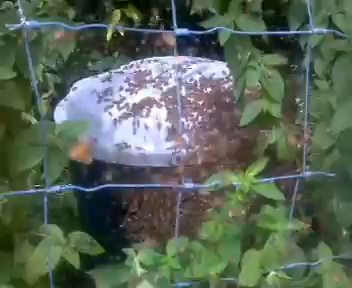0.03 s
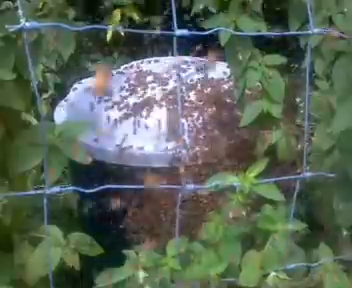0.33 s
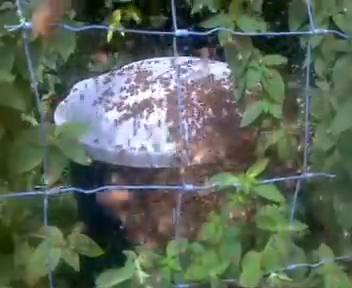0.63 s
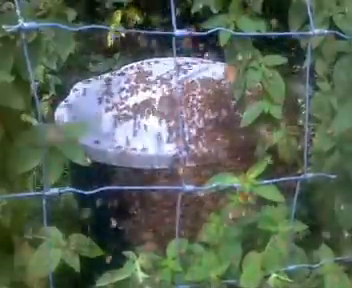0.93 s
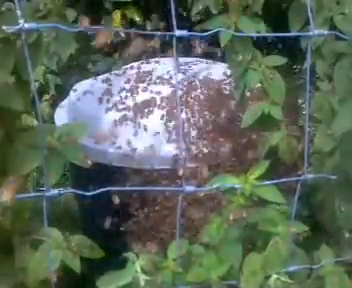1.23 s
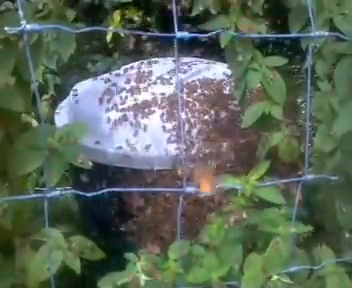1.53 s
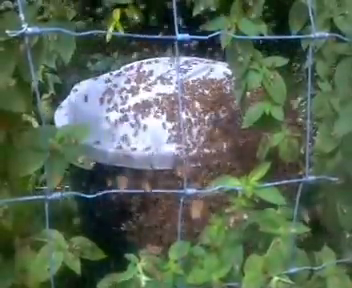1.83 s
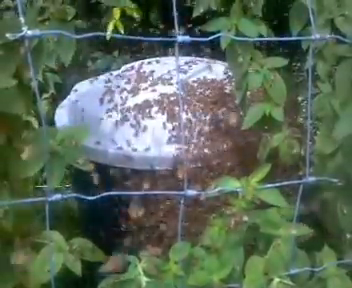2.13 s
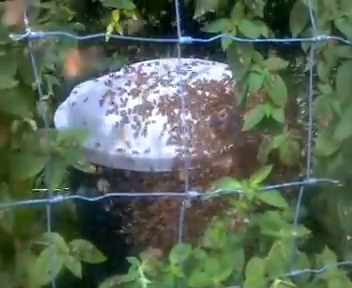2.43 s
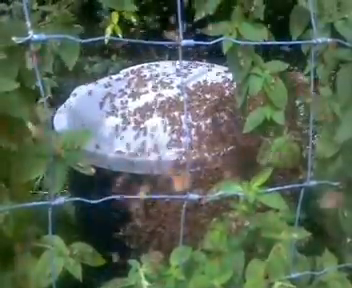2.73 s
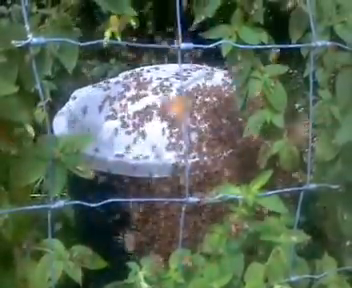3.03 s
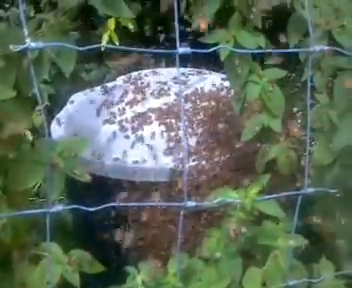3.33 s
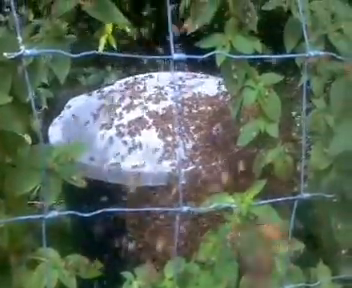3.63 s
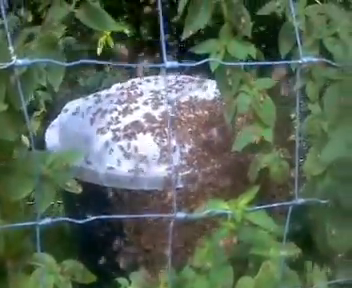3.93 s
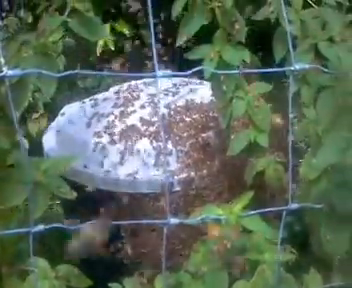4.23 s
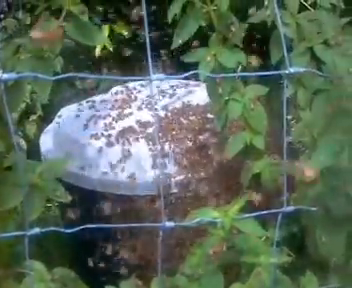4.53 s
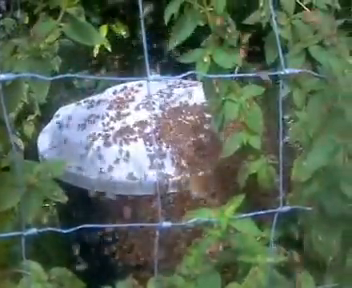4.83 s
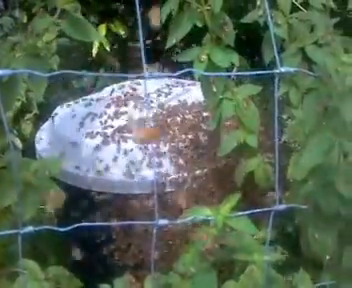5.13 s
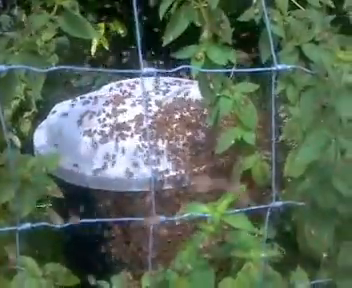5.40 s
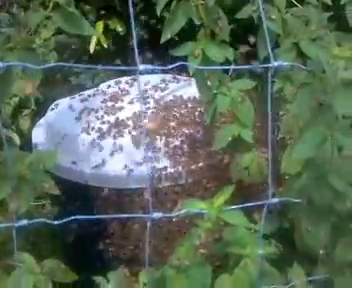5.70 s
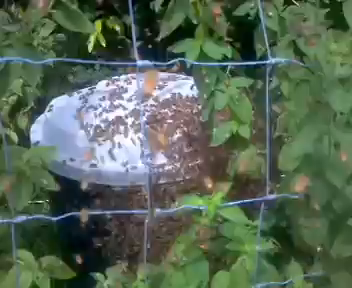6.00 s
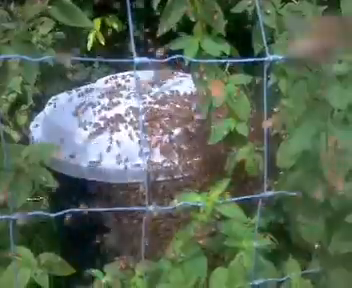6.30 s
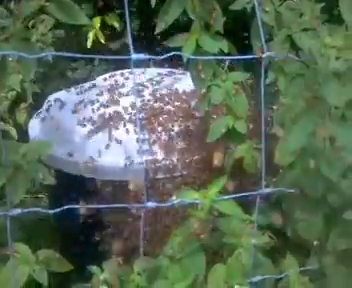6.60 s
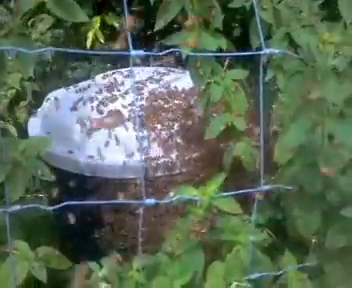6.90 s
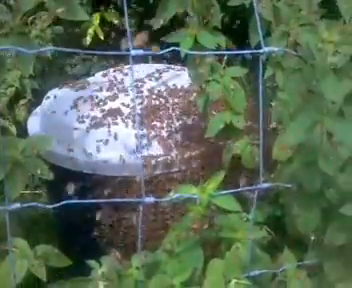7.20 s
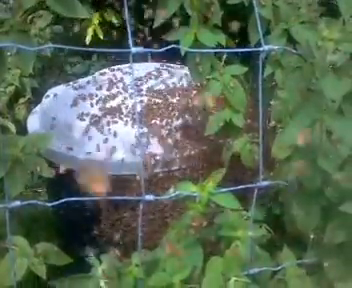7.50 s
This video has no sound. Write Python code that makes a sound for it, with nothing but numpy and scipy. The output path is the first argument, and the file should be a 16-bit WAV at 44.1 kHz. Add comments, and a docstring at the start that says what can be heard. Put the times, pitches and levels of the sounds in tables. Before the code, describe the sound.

Outdoors among leaves, a mass of bees drones continuously, with individual bees darting close past the stereo microphones, mostly toward the left. From the start a bigger insect adds a bright, scratchy trill above its own low hum. After about four seconds the trill quickens into tiny squeaks and ends on one brief falling chirp, leaving the slightly softer swarm and a faint hiss.

```python
"""From the start, honeybees swarm round a bucket in the undergrowth: their wingbeats blend into a hum
near 250 Hz over a soft hiss, and single bees swell out of it as they pass. Among them a larger insect
rasps at 120 strokes a second. Just after 4 s it speeds up and squeaks, then stops with a short chirp
at about 4.5 s. The bees buzz on to the end, a little quieter. All of this reaches two microphones;
each channel is one microphone minus a delayed copy of the other."""
import sys
import numpy as np
from scipy import signal
from scipy.fft import rfft, irfft, next_fast_len
from scipy.io import wavfile
from scipy.ndimage import uniform_filter1d, map_coordinates

SR = 44100
rng = np.random.default_rng(int(sys.argv[2]) if len(sys.argv) > 2 else 0)


def digitize_waveform(pressure):
    """Quantize a signal to 16-bit integers and store it at the path in sys.argv[1].

    Rows of a 2-D input are taken as channels; values are limited to [-1, 1].
    """
    field = np.atleast_2d(pressure).T
    bounded = np.clip(field, -1, 1)
    quanta = np.round(bounded * 32767).astype(np.int16)
    wavfile.write(sys.argv[1], SR, quanta)


N = 341775
T = np.arange(N) / SR


# The swarm's low note, the note an octave up, and the buzz above both: f/Hz, level/dB
LOW_NOTE_TONE = [(20, -90), (100, -30), (190, -8), (245, -7.5), (285, -1), (340, -27), (450, -61)]
OCTAVE_TONE = [(20, -120), (290, -26), (390, -1), (500, -3), (560, 2), (630, -29), (760, -56)]
BUZZ_TONE = [(20, -120), (500, -17), (630, -4.5), (760, -3), (870, 1.5), (1000, 0), (1300, -1),
             (1500, -7.5), (1900, -19), (2500, -38), (3200, -19), (6000, -25.5), (15000, -53)]

def swarm():
    """Brisk bees, slower loaded ones and a few off-pitch strays; their tangled overtones buzz."""
    mean_db, swell_db = swarm_activity()
    brisk = wingbeats(count=64, pitch_hz=252.8, drift=.031, waver=.016, swell=3.5, lag_ms=.15, lean=.23)
    loaded = wingbeats(count=30, pitch_hz=231.4, drift=.05, waver=.026, swell=0, lag_ms=.17, lean=.11)
    strays = wingbeats(count=10, pitch_hz=232.4, drift=.11, waver=.02, swell=1.5, lag_ms=.18, lean=.16)
    bees = unit(brisk) + amp(-2) * unit(loaded) + amp(-13) * unit(strays)
    bees = leaf_echo(bees, echo_db=-21, fade_s=0.24)
    low_note = amp(-3 + 1.1 * swell_db) * shaped(bees, LOW_NOTE_TONE)
    octave = amp(0.2 + 0.69 * swell_db) * shaped(bees, OCTAVE_TONE)
    buzz = amp(-5 + swell_db) * shaped(bees, BUZZ_TONE)
    return amp(mean_db) * (low_note + octave + buzz)


def wingbeats(count, pitch_hz, drift, waver, swell, lag_ms, lean):
    """Each wingbeat is one pulse of air; every bee wanders in pitch, distance and direction."""
    out = np.zeros((2, N + 1))
    t = np.arange(0, N / SR + .2, .004)
    for _ in range(count):
        rate = pitch_hz * np.exp(drift * wobble(1.2, t) + waver * wobble(17, t))
        cycles = np.cumsum(rate) * t[1] + rng.random()
        beat_times = np.interp(np.arange(2, cycles[-1]), cycles, t)
        strength = np.interp(beat_times, t, amp(1.45 * swell * np.tanh(wobble(3.03, t) / 2)))
        lag_s = np.interp(beat_times, t, lag_ms * wobble(1, t)) / 1000
        rightward = np.interp(beat_times, t, lean * wobble(4, t))
        for mic, side in enumerate((-.5, .5)):
            pulse = strength * (1 + 2 * side * rightward)
            at = (beat_times + side * lag_s - .05) * SR
            inside = (at >= 0) & (at < N)
            whole, part = at[inside].astype(int), at[inside] % 1
            out[mic, whole] += pulse[inside] * (1 - part)  # two samples share each pulse
            out[mic, whole + 1] += pulse[inside] * part
    return out[:, :N] - out.mean()


# How busy the swarm is close by: t/s, level/dB
SWARM_LEVEL = [(0.0, -34), (0.75, -35.0), (0.93, -33.0), (1.77, -35), (2.01, -33), (2.67, -34.0),
               (2.79, -33), (3.15, -35.5), (3.48, -36), (3.84, -33.5), (3.97, -36.5), (4.9, -37.5),
               (5.35, -36.5), (6.0, -37.5), (6.45, -38), (6.7, -37.5), (7.42, -36.5), (7.75, -38)]

def swarm_activity():
    """The swarm's average level, and how far it swells above or sinks below that, in dB."""
    level_db, = curves(SWARM_LEVEL)
    return level_db.mean(), level_db - level_db.mean()


# Bees passing close by:
# t/s, wingbeat f/Hz, low note level/dB, octave level/dB, lean to the left (0-1), half-length/s
CLOSE_PASSES = [(0.791, 252.4, -42, -35.5, 0.4, 0.061), (0.925, 252, -33, -35, 0.35, 0.036),
                (1.052, 251, -35, -31.5, .65, 0.04), (1.242, 245.5, -33.5, -37, .55, 0.032),
                (1.48, 239.4, -43, -36, 0.2, 0.029), (1.51, 255.7, -42, -33.5, 0.2, .04),
                (1.96, 249, -43, -35.5, 0.1, 0.068), (2.116, 240, -35, -37, 0.9, 0.039),
                (2.251, 243, -33, -33, .3, 0.041), (2.629, 221, -44, -40, .3, .09),
                (4.679, 218.7, -41, -38.5, .3, 0.064), (4.8, 259.3, -46, -35, .3, 0.037),
                (2.5, 229.7, -32, -35, 0.4, 0.041), (2.782, 255.4, -26.5, -33.5, 1, 0.037),
                (3.554, 244, -32.5, -36, 0.9, 0.036), (3.751, 249, -31, -33.5, .25, 0.038),
                (3.871, 225.3, -21.5, -27, 0.8, 0.015), (4.146, 241, -31, -43, 0, 0.029),
                (4.556, 258.7, -36, -35, 0.1, 0.0362), (4.65, 257, -33, -39, 0.3, 0.033),
                (5.107, 253, -29.5, -40, 0, 0.027), (5.264, 244, -30.5, -36.5, 0.6, 0.041),
                (5.958, 250, -34, -39, 0.55, 0.033), (6.883, 251, -40, -48, 0.7, 0.037),
                (6.976, 241, -39, -55, 0.4, .035), (7.188, 267.4, -44, -37.5, 0.1, 0.039),
                (7.415, 248, -40, -33, 0.7, 0.031)]

def passing_bees(doppler_s=0.00036, waver=0.0083):
    """A close bee swells and fades; the quicker it goes by, the further its pitch falls."""
    out = np.zeros((2, N + SR))
    t = np.arange(SR // 2) / SR - 1 / 4  # zero when the bee is closest
    sides = np.array([[1], [-1]])  # left, right
    for when, hz, low_db, octave_db, lean, half_s in CLOSE_PASSES:
        swell = np.hanning(len(t)) / (1 + (t / half_s) ** 2)
        fall = doppler_s / half_s * np.tanh(t / half_s)
        pitch = hz * (1 - fall + waver * wobble(24.87, t + 1))
        lag_s = rng.normal(0, 0.0001) * sides / 2
        phase = 2 * np.pi * (np.cumsum(pitch) / SR + hz * lag_s)
        levels = [low_db - 2, octave_db - 3] + [octave_db - 14 - 2 * k for k in range(7)]
        buzz = sum(amp(db) * np.sin(k * phase + 2 * np.pi * rng.random())
                   for k, db in enumerate(levels, 1))
        out[:, round(when * SR):][:, :len(t)] += np.sqrt(2) * swell * buzz * (1 + lean * sides)
    return out[:, SR // 4:][:, :N]


# The larger insect's strokes a second, before the speed-up is added: t/s, f/Hz
CRUISING_RATE = [(0.05, 122), (0.42, 118.8), (0.9, 120.2), (1.05, 118.6), (1.55, 120.8), (1.66, 119.5),
                 (2.08, 121), (2.35, 119.5), (2.55, 121), (2.8, 119.8), (4.14, 120.3)]

def large_insect(speed_up=.115, jitter=0.005):
    """Each stroke pushes the air and scrapes: a low hum under a trill of short bursts."""
    cruise, = curves(CRUISING_RATE)
    rate = cruise * (1 + speed_up * ramp(start_s=4.16, length_s=0.156))
    strokes = np.cumsum(rate * (1 + jitter * wobble(29.88, T))) / SR  # strokes made so far
    hum = at_both_mics(insect_hum(strokes), lag_ms=-0.1)
    trill = rasp(strokes) + squeaks(strokes) + last_chirp()
    return hum + leaf_echo(at_both_mics(trill, lag_ms=-0.017), echo_db=-13, fade_s=0.04)


# The pure tones in the insect's hum: multiple of the stroke rate, level/dB
HUM_TONES = [(1, 0.5), (2, 8), (3, 2), (4, -3), (5, -11.5)]
# The changing boost on the third of those tones: t/s, level/dB
THIRD_TONE_BOOST = [(0.0, 7), (0.13, 8), (0.3, 3.5), (1.05, 1), (2.55, 4), (2.76, -1), (2.88, 5.5),
                    (3.2, 0), (3.9, 5.5), (4.05, -2), (4.2, 6)]

def insect_hum(strokes, fade_start_s=4.23, fade_db_per_s=86, waver_db=1.1):
    """Air pushed by the strokes hums on, then dies away, the highest tones first."""
    fade_db = fade_db_per_s * np.maximum(T - fade_start_s, 0)
    boost_db, = curves(THIRD_TONE_BOOST)
    hum = np.zeros(N)
    for k, db in HUM_TONES:
        level_db = db + (k == 3) * boost_db - k * fade_db + waver_db * wobble(15, T)
        hum += amp(level_db) * np.sin(2 * np.pi * (k * strokes + rng.random()))
    return np.sqrt(2) * amp(-49) * hum


# How strong the two scrapes are: t/s, low scrape level/dB, high scrape level/dB
SCRAPE_LEVELS = [(0.0, -45, -44), (0.1, -49.5, -46), (0.42, -45, -45.5), (0.62, -44.5, -50),
                 (0.72, -41.5, -44), (0.93, -42.5, -46), (1.02, -45.5, -47), (1.2, -39, -42),
                 (1.35, -43.5, -43), (1.75, -41, -41), (1.9, -39, -39.5), (2.08, -40.5, -43),
                 (2.21, -42, -38.5), (2.5, -39, -43.5), (2.8, -42, -41.5), (2.87, -46, -59),
                 (2.95, -45, -52), (3.1, -44.5, -50), (3.3, -44, -46), (3.6, -45.5, -46.5),
                 (3.9, -48, -45.5), (4.18, -43.5, -47.5), (4.3, -48, -59), (4.42, -49, -57),
                 (4.51, -48.5, -57.5), (4.55, -68, -70)]
# The tone of the low scrape and of the high one: f/Hz, level/dB
LOW_SCRAPE_TONE = [(1500, -58), (2800, -20.5), (3500, -9), (3900, -5.5), (4220, 0.5), (4500, -4),
                   (4900, -2.5), (5400, -6), (6500, -43)]
HIGH_SCRAPE_TONE = [(4600, -37), (5300, 8.5), (5800, 1.5), (6380, 0), (6600, -3), (6850, -5), (7600, -19),
                    (11000, -40)]

def rasp(strokes, lead=0.036, between_strokes=.11, flutter_db=0.5):
    """A short bright scrape leads a longer, lower one; the return stroke scrapes faintly."""
    return_stroke = amp(-9) * burst(strokes - .58, sharpness=2.6)
    low_bursts = burst(strokes, sharpness=1.5) + return_stroke
    high_bursts = burst(strokes + lead, sharpness=2.6)
    low = patchy(scraping(strokes), depth_db=1.3) * (low_bursts + between_strokes)
    high = patchy(scraping(strokes), depth_db=1.5) * (high_bursts + between_strokes)
    low_db, high_db = curves(SCRAPE_LEVELS)
    steady = amp(low_db - 3.5) * shaped(low, LOW_SCRAPE_TONE)
    steady += amp(high_db - 3.5) * shaped(high, HIGH_SCRAPE_TONE)
    return (steady + ringing(low, high)) * amp(flutter_db * wobble(16, T))


def burst(strokes, sharpness):
    """One smooth burst a stroke; more sharpness makes it shorter."""
    return np.maximum(np.cos(2 * np.pi * strokes), 0) ** sharpness


def scraping(strokes, likeness=.58):
    """Noise that partly repeats: each stroke rubs over much the same surface as the one before."""
    noise = rng.standard_normal((int(strokes[-1]) + 2, SR // 100))  # one row a stroke
    surface = signal.lfilter([1], [1, -likeness], noise, axis=0)
    row = strokes.astype(int)
    samples_in = np.arange(N) - np.searchsorted(row, row)
    return surface[row, samples_in % surface.shape[1]]


def patchy(x, depth_db):
    """Narrow bands of pitch swell and fade at random, a few hundredths of a second each."""
    bands = signal.stft(x, nperseg=256)[2]
    patches = uniform_filter1d(rng.standard_normal(bands.shape), size=3, axis=0)
    patches = uniform_filter1d(patches, size=24, axis=1)
    return unit(signal.istft(bands * amp(depth_db * unit(patches)), nperseg=256)[1][:N])


# Moments when the rasp rings: t/s, f/Hz, level/dB, half-length/s
RINGS = [(0.017, 6600, -37.5, 0.018), (0.2, 6320, -47, .015), (0.83, 4120, -44, .035),
         (0.937, 4150, -44, .035), (1.319, 6280, -44, .025), (1.837, 5700, -34, 0.022),
         (2.05, 5740, -35, 0.037), (2.047, 4400, -42, .025), (2.163, 4240, -37, .016),
         (2.277, 4260, -44, 0.038), (2.337, 5820, -44, .02), (2.46, 5620, -40, .04),
         (2.55, 6440, -42, 0.014), (2.68, 4240, -42, 0.015), (2.74, 6300, -46, .055),
         (3.03, 4150, -40.5, 0.021), (3.15, 4280, -42, 0.022), (3.22, 4380, -39, 0.024),
         (3.6, 5530, -39, .05), (3.81, 4320, -39.5, 0.025)]

def ringing(low, high, half_width_hz=260):
    """Now and then the scraping catches one narrow resonance, which swells and fades."""
    out = np.zeros(N)
    for when, hz, db, half_s in RINGS:
        span = slice(max(round(when * SR) - SR // 4, 0), round(when * SR) + SR // 4)
        scrape = low if hz < 5000 else high
        band = signal.butter(1, [hz - half_width_hz, hz + half_width_hz], "bandpass", fs=SR)
        swell = np.exp(-((T[span] - when) / half_s) ** 2 / 2)
        out[span] += amp(db - 9) * unit(signal.filtfilt(*band, scrape[span])) * swell
    return out


def squeaks(strokes, start_s=4.3, end_s=4.47, first_hz=4700, climb_hz_per_s=4800, fall=0.22):
    """The closing strokes ring out as tiny falling squeaks, each higher and louder than the last."""
    top_hz = first_hz + climb_hz_per_s * np.maximum(T - start_s, 0)
    within_stroke = strokes % 1
    pitch = top_hz * (1 - fall * within_stroke)
    growth = np.sqrt(ramp(start_s, end_s - start_s)) * (T < end_s)
    pulses = np.sin(np.pi * within_stroke) ** 2
    return amp(-41.5) * growth * pulses * np.sin(2 * np.pi * np.cumsum(pitch) / SR)


# The path of the insect's closing chirp: t/s, f/Hz, level/dB
CHIRP_PATH = [(4.468, 4950, -20), (4.475, 5250, -1), (4.494, 5280, -1), (4.506, 5200, -6),
              (4.518, 5100, -1), (4.538, 3800, -5), (4.548, 3600, -30)]

def last_chirp(roughness=0.017):
    """The very last stroke holds a rough, high note, then slides down."""
    pitch, level_db = curves(CHIRP_PATH)
    pitch *= 1 + roughness * wobble(900, T)
    sounding = (T > CHIRP_PATH[0][0]) & (T < CHIRP_PATH[-1][0])
    return amp(level_db - 42.5) * sounding * np.sin(2 * np.pi * np.cumsum(pitch) / SR)


def leaf_echo(x, echo_db, fade_s):
    """Leaves scatter the sound into a short, blurred echo, different at each microphone."""
    t = np.arange(SR // 8) / SR
    tail = rng.standard_normal((2, len(t))) * amp(-60 * t / fade_s)
    tail /= np.linalg.norm(tail, axis=1, keepdims=True)
    return x + amp(echo_db) * signal.fftconvolve(x, tail, axes=1)[:, :N]


# The tone of the fine hiss and of the low air noise: f/Hz, level/dB
HISS_TONE = [(40, 9.5), (110, 4), (320, -1), (800, 5.5), (1500, 9.5), (2150, 11), (2700, -4), (3200, 5),
             (4000, -1.6), (5100, -2), (5850, 8), (6500, 4), (9000, 3.5), (11600, -2.5), (13500, 1.5),
             (15000, 1.7)]
AIR_TONE = [(20, -9), (45, -20), (70, -11), (110, -3.5), (180, -3), (300, -3), (800, -7), (3000, -56)]

def background(flicker_db=0.63):
    """A fine hiss, different on each side, and faint air noise shared by both swell with the swarm."""
    mean_db, swell_db = swarm_activity()
    hiss = shaped(rng.standard_normal((2, N)), HISS_TONE) * amp(flicker_db * wobble(14, T))
    air = shaped(rng.standard_normal(N), AIR_TONE)
    return amp(mean_db - 6 + 0.89 * swell_db) * hiss + amp(-50.5 + 1.46 * swell_db) * air


def amp(db):
    """Turns decibels into a number to multiply by."""
    return 10 ** (np.asarray(db) / 20)


def unit(x):
    """Scales x to an average strength (rms) of 1."""
    return x / np.sqrt(np.mean(x ** 2) + 1e-20)


def curves(rows):
    """Turns each column after the time into one value per sample."""
    times, *columns = np.transpose(rows)
    return [np.interp(T, times, column) for column in columns]


def ramp(start_s, length_s):
    """Rises evenly from 0 to 1, then stays there."""
    return np.clip((T - start_s) / length_s, 0, 1)


def wobble(rate, t):
    """A smooth curve at the times t, through `rate` random points a second."""
    steps = np.arange(0, t[-1] * rate + 1, 1 / 8)
    smooth = map_coordinates(rng.standard_normal(1024), [steps + 2], mode="mirror")
    return np.interp(t * rate, steps, smooth)


def filtered(x, response):
    """Scales and delays each frequency in x as response(hz) says."""
    size = next_fast_len(N + 8192, True)
    return irfft(rfft(x, size) * response(np.fft.rfftfreq(size, 1 / SR)), size)[..., :N]


def level_at(points, hz):
    """Reads between the rows of an f/Hz, level/dB table, with octaves evenly spaced."""
    f, db = np.transpose(points)
    return np.interp(np.log(hz + 1), np.log(f), db)


def shaped(x, tone):
    """Gives x the tone in a table, at strength 1."""
    return unit(filtered(x, lambda hz: amp(level_at(tone, hz))))


def at_both_mics(x, lag_ms):
    """One sound at both microphones; with a negative lag it reaches the right one first."""
    return filtered(x, lambda hz: np.exp(1j * np.pi * hz * lag_ms * np.array([[1e-3], [-1e-3]])))


def scene():
    """Everything that reaches the two microphones."""
    return swarm() + passing_bees() + large_insect() + background()


# How much more the left microphone picks up than the right: f/Hz, level/dB
MIC_BALANCE = [(100, 2), (350, 2.5), (700, -5), (1200, -0.5), (1900, -3.5), (3200, -3.5), (4500, 10),
               (5800, 3.5), (7000, 3.5), (12000, 5), (15000, 7)]

def record(dry, delay_s=1 / 2590, top_hz=15750):
    """Taking the delayed opposite microphone from each side widens the sound and thins some pitches."""
    heard = filtered(dry, lambda hz: amp(level_at(MIC_BALANCE, hz) * np.array([[.5], [-.5]])))
    opposite = filtered(heard[::-1], lambda hz: np.exp(-2j * np.pi * hz * delay_s))
    return filtered(heard - opposite, lambda hz: hz < top_hz)


dry = scene()
out = record(dry)
digitize_waveform(out)
```